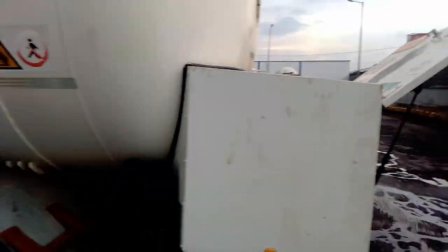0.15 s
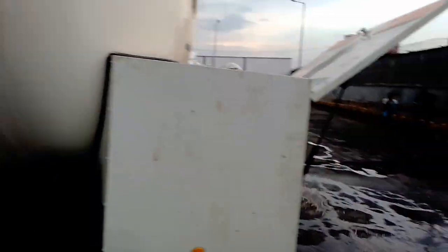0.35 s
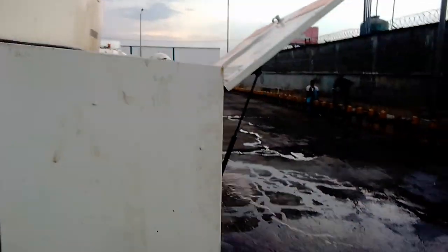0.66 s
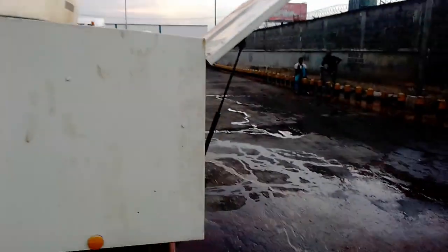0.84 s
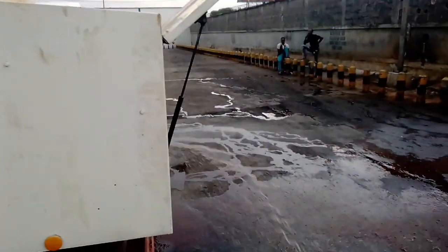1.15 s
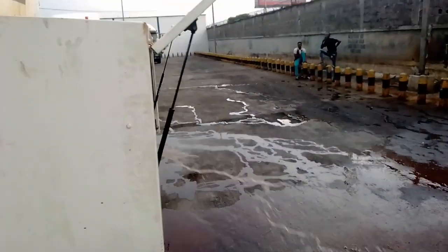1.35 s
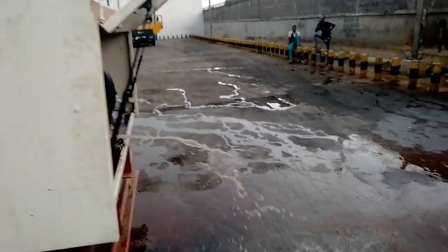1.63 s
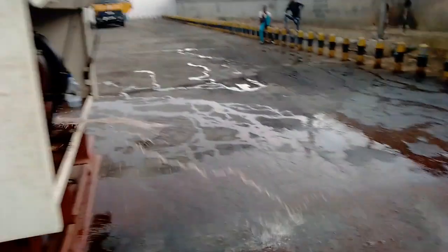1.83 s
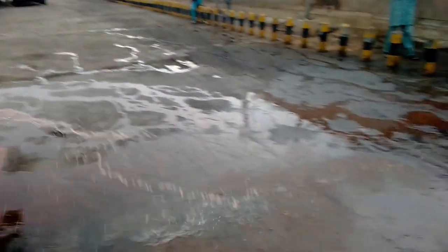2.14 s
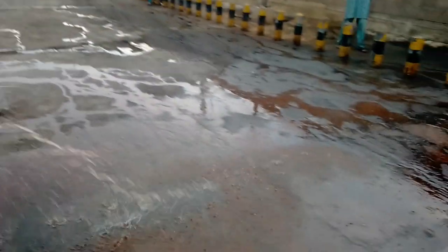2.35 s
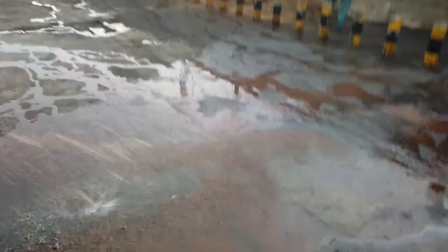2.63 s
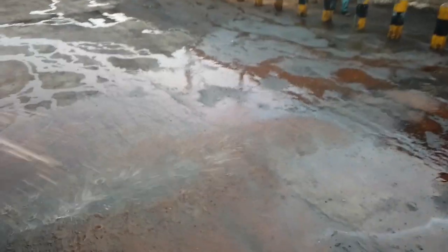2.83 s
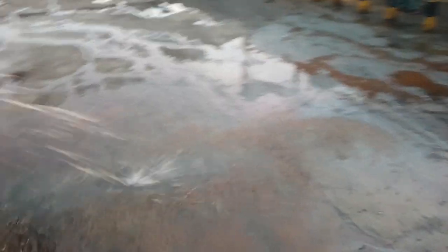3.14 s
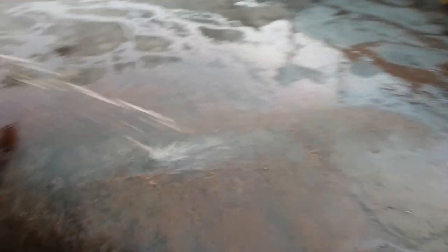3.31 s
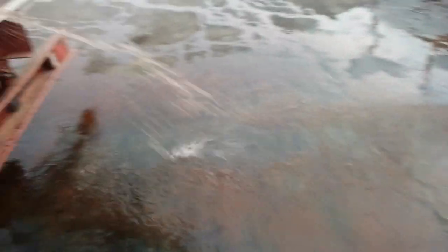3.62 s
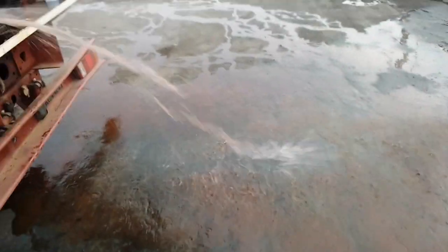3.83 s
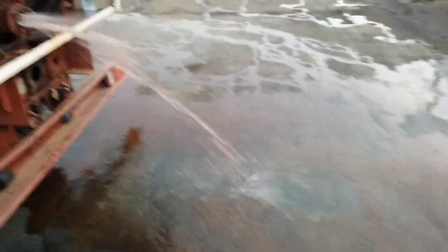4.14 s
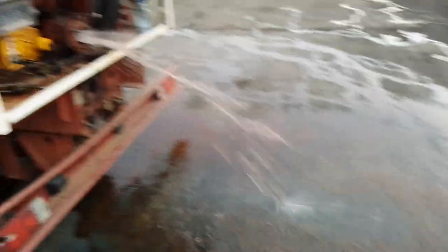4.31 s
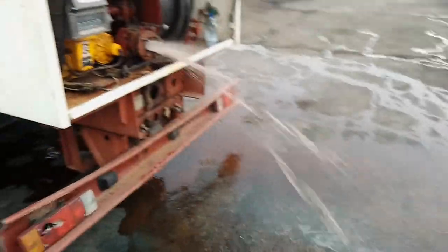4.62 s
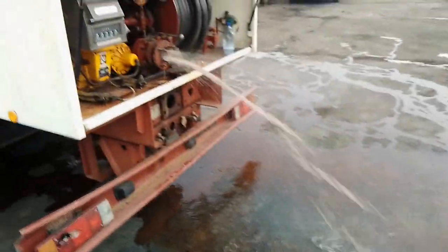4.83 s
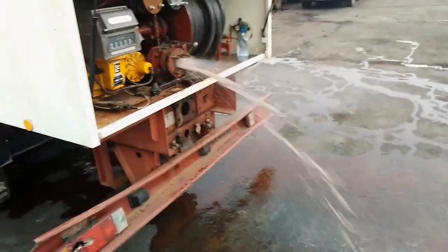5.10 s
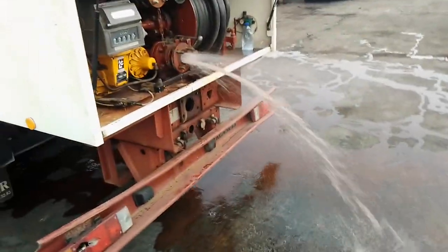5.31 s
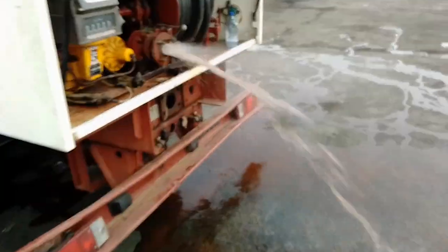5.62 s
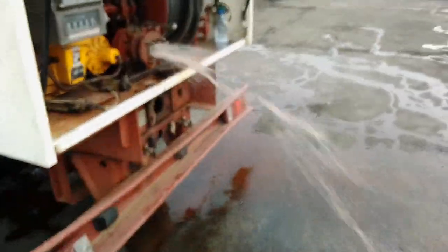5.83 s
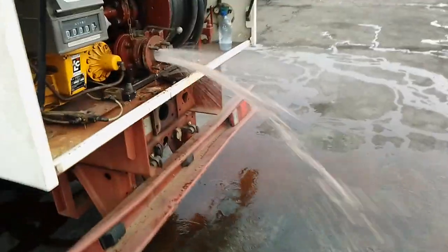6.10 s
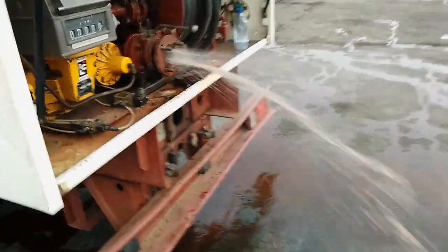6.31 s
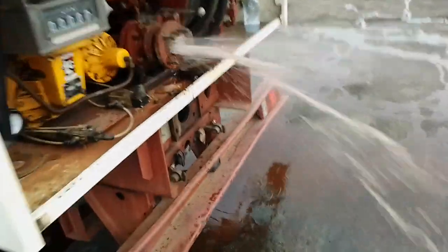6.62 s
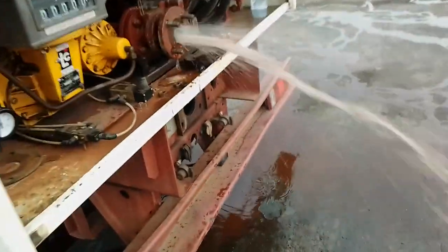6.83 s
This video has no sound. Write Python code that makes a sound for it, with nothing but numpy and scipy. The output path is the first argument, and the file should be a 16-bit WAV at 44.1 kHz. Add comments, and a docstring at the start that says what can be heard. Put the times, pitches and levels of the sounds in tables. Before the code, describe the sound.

Outdoors, a tanker truck's pump keeps up a thin, steady drone while liquid sprays out and splashes on wet pavement. The stream lands in uneven gushes with a few sudden bursts, then sharp slaps of large drops crowd in. A smoother rush blends with the spatter as the microphone, carried around the truck's rear, nears the outlet. The splashing sounds crisp and slightly tinny.

```python
"""At the rear of a tanker truck, on one small microphone carried round it. From the start the pump
drones and its jet breaks up and spatters on wet concrete; the microphone rings near 4 and 12 kHz at
every drop and cuts the drone's bass. Near 1, 2 and 3 s the jet comes back in a burst. Big drops slap
down thickest from 2 to 4.7 s, with a puff of wind near the end of that stretch. From 5 s we are
nearer the nozzle, and a smoother, pulsing wash joins the spatter."""
import sys
import numpy as np
from scipy import signal
from scipy.fft import next_fast_len
from scipy.io import wavfile
from scipy.ndimage import uniform_filter1d

SR = 44100
rng = np.random.default_rng(int(sys.argv[2]) if len(sys.argv) > 2 else 0)


def unload_audio(sound):
    """Save the sound as a 16-bit wav file, at the path given as the first command line argument."""
    columns = np.transpose(np.atleast_2d(sound))
    # keep every value between -1 and 1, then stretch to whole-number steps
    steps = np.round(np.clip(columns, -1, 1) * 32767)
    wavfile.write(sys.argv[1], SR, steps.astype(np.int16))


N = 306936
T = np.arange(N) / SR

# The jet as the microphone rounds the cabinet and turns. Each row: time in seconds, then levels in dB
# of the spatter between gushes, the fine spray, the 6 kHz edge and the 8 kHz middle treble.
JET_LEVELS = [(0, -37.5, -49.5, -51.5, -60), (.46, -35.5, -48, -44, -61), (.9, -35, -50, -51, -60.5),
              (.95, -37.5, -49.5, -46, -58), (1.15, -33, -48, -43.5, -56.5), (1.9, -37, -50, -55, -60),
              (2.05, -33.5, -51.5, -48, -54), (2.35, -33, -45.5, -50, -54), (2.8, -33, -45.5, -45.5, -54.5),
              (2.92, -37.5, -37, -40.5, -49), (3.02, -37, -46, -42.5, -56), (3.3, -32.5, -41.5, -45, -55.5),
              (3.8, -30, -45, -62, -53), (4.3, -36, -47.5, -55, -51), (4.65, -29, -46.5, -53, -53),
              (5.05, -33, -46.5, -47, -57), (5.7, -29, -45, -52, -54.5), (6.2, -30.5, -45.5, -48, -57.5),
              (6.5, -29, -47, -45, -56), (6.96, -31.5, -47, -50, -56)]
# Each row: peak time in seconds, level in dB, length in seconds.
JET_GUSHES = [(.225, -33.5, 0.082), (.668, -34.5, 0.019), (1.4, -32.5, 0.028), (1.49, -38, 0.076),
              (1.62, -33.5, 0.032), (1.75, -31.5, 0.06), (2.055, -29, 0.12), (2.335, -32, 0.11),
              (2.534, -27, 0.039), (2.669, -32.5, 0.038), (2.76, -33.5, 0.043), (2.878, -27, 0.08),
              (3.108, -33, 0.021), (3.168, -31.5, 0.042), (3.273, -30, 0.11), (3.442, -30.5, 0.034),
              (3.582, -29, 0.06), (3.717, -31, 0.075), (3.94, -29.5, 0.12), (4.011, -31.5, 0.024),
              (4.21, -28, 0.11), (4.43, -29.5, .06), (4.605, -29, 0.048), (4.959, -29, 0.11),
              (5.113, -29.5, 0.024), (5.208, -29.5, 0.028), (5.517, -34, 0.04), (5.941, -34, 0.017),
              (6.306, -32.5, 0.055), (6.55, -43, 0.029), (6.765, -28.5, 0.045), (6.93, -26, 0.032)]  # a thick length of the broken jet lands
JET_BURSTS = [(.936, -25.5, 0.084), (1.925, -31.5, 0.024), (3.074, -27, 0.038)]  # the jet returns all at once
HEAVY_SLOPS = [(.21, -43, 0.078), (.62, -53, .1), (.96, -38.5, .07), (1.766, -49, 0.068),
               (2.04, -43.5, 0.11), (2.888, -44, 0.052), (3.283, -50, .08), (3.612, -42, 0.032),
               (3.8, -45, 0.052), (4.43, -39.5, 0.038), (4.654, -46, 0.056), (6.291, -46, 0.1),
               (6.93, -46, 0.073)]  # heavy slops of liquid
WIND_PUFF = [(4.38, -65.5, 0.12)]  # a puff of wind
# The jet breaks off briefly. Each row: time in seconds, dip in dB, length in seconds.
JET_BREAKS = [(.05, -1.5, .04), (1.877, -3, 0.036), (2.262, -5, 0.069), (3.047, -1.5, 0.066),
              (3.352, -11, 0.031), (3.823, -1.5, .04), (4.782, -6, 0.042)]
# Low splashing between slops. Each row: time in seconds, level in dB.
SLOSH_LEVELS = [(0, -50.5), (1.9, -51), (2.4, -46), (4, -46.5), (4.5, -51.5), (5, -48), (6.96, -50)]
# Big drops on the concrete. Each row: start in seconds, peak of the ring in dB, its pitch in Hz.
BIG_DROPS = [(0.2156, -15, 3470), (0.6271, -17, 3780), (0.9374, -13, 4130), (1.1235, -13, 4370),
             (1.4089, -16, 4190), (1.9227, -13, 3770), (1.9456, -16, 4040), (2.241, -18, 3950),
             (2.2724, -23, 4250), (2.2859, -12, 3810), (2.3153, -15, 3600), (2.3323, -13, 3680),
             (2.3637, -11, 4330), (2.3806, -12, 3790), (2.4156, -7, 4000), (2.4679, -19, 4030),
             (2.4864, -13, 3910), (2.5223, -11, 3810), (2.5647, -14, 3930), (2.6426, -14, 4440),
             (2.6685, -11, 3720), (2.7533, -14, 3580), (2.8152, -17, 3490), (2.8266, -12, 3530),
             (2.8481, -12, 3990), (2.8695, -9, 3670), (3.0721, -15, 4230), (3.1085, -11, 3940),
             (3.1479, -17, 4130), (3.1624, -4, 3750), (3.2227, -11, 3810), (3.2601, -12, 3960),
             (3.329, -14, 3630), (3.3704, -18, 3800), (3.4038, -14, 3550), (3.4971, -16, 3710),
             (3.5141, -11, 3980), (3.5475, -11, 4030), (3.5754, -12, 3580), (3.5944, -11, 3800),
             (3.6104, -12, 3590), (3.6403, -13, 3990), (3.7021, -14, 3490), (3.8638, -12, 3650),
             (3.9461, -12, 3750), (4.0903, -10, 3840), (4.1227, -17, 3760), (4.1372, -12, 3720),
             (4.1566, -14, 3780), (4.1995, -12, 3620), (4.226, -11, 3850), (4.3621, -16, 3590),
             (4.429, -13, 3900), (4.4804, -12, 3700), (4.5193, -14, 3760), (4.5522, -10, 3840),
             (4.6904, -12, 3620), (4.7333, -18, 3670), (5.1065, -11, 3750), (6.2858, -10, 4010),
             (6.4554, -8, 3740), (6.5197, -15, 3950), (6.6075, -13, 3680), (6.8854, -13, 3890),
             (6.9109, -16, 4060), (6.9248, -11, 3940)]
# The microphone's ring near 4 kHz. Each row: offset from the centre in Hz, gain in dB.
SPATTER_SHAPE = [(-1500, -18), (-850, -9), (-350, 1), (-14, 3.5), (350, -0.5), (698, -2), (1244, -6),
                 (1900, -14.5), (2586, -44.5)]
# Tone colours at the microphone. Each row: frequency in Hz, gain in dB.
SLOP_SHAPE = [(700, -40), (1100, -24), (1500, 7), (1900, 3.5), (2500, 2), (3000, -14), (3600, -80)]
EDGE_SHAPE = [(5000, 3.5), (5500, 2), (5800, 1.5), (6300, -6), (6800, -11), (7300, -60)]
MIDDLE_SHAPE = [(6000, -16), (6900, -5), (7600, -6), (8600, -4.5), (9500, -7), (11000, -6), (12500, -45)]
SPRAY_SHAPE = [(5590, -50), (9500, -16.5), (10900, -13.5), (12600, 1), (13200, -4), (14100, 0), (15800, -7)]
WIND_TRAFFIC_SHAPE = [(12, -41), (20, -11), (22, -18), (27, -23), (54, -15.5), (113, 7), (135, 2),
                      (165, -10.5), (210, -39), (360, -120)]
# Treble bands that slide as the microphone turns. Each row: start and end in seconds,
# first and last frequency in Hz, width in Hz, level in dB before the jet's flicker.
TREBLE_GLINTS = [(.15, .7, 11850, 11950, 350, -61), (3.05, 4.8, 8700, 7600, 600, -55),
                 (3.8, 5, 7500, 6700, 500, -59), (3.05, 4.25, 12900, 12250, 900, -43),
                 (3.2, 3.8, 13900, 13200, 500, -51), (3.75, 4.45, 11150, 10850, 700, -51),
                 (6.5, 7.6, 12450, 12450, 1000, -42), (3.7, 4.6, 5300, 4500, 800, -50)]
# The pump on the way round the cabinet. Each row: time in seconds, then levels in dB, before
# filtering, of the seven parts below in their order.
PUMP_LEVELS = [(0.1, -47, -45.5, -47.5, -48.5, -54, -57, -50), (1.64, -45, -50.5, -48, -44, -51, -61, -56),
               (1.96, -44.5, -48.5, -45.5, -43.5, -57, -52.5, -50),
               (3.13, -43, -49.5, -47, -39.5, -50, -52, -47.5),
               (4.31, -43.5, -48.5, -45.5, -42.5, -59, -44.5, -60),
               (4.4, -43, -44.5, -41.5, -43, -52, -50, -55),
               (4.73, -44, -52, -46.5, -40.5, -47.5, -48, -58),
               (5.02, -46, -48, -45.5, -46, -45.5, -44, -46),
               (6.17, -50, -48.5, -45, -45.5, -50.5, -48.5, -45),
               (6.29, -45, -48.5, -43, -41.5, -47, -49, -43),
               (6.85, -45.5, -46.5, -46.5, -40.5, -47.5, -47, -44.5)]
# The pump's resonances. Each row: frequency in Hz, width in Hz, relative level in dB.
DRONE_MODES = [(231.3, 39, -12), (271, 31, -5), (296.6, 15.4, -2.5)]
CASING_MODES = [(320, 16, 2), (418, 96, 9.5)]
LOW_PANEL_MODES = [(637, 93, 0.5), (788, 54, 2.5), (868.5, 37, 1)]
HIGH_PANEL_MODES = [(1047, 75, 6.5), (1199, 53, 5.5), (1277, 21, 6), (1366, 94, 5.5), (1462, 17, 6.5),
                    (1614, 90, 5.5), (1655, 140, -9.5)]
LOW_HUM_MODES = [(522.7, 32, -7), (549, 110, -7)]
HIGH_HUM_MODES = [(948, 34, -3.5), (955, 76, -16)]
WHINE_MODES = [(1353, 32, 0)]

SPATTER_HZ, SPATTER_WANDER_HZ = 3808, 49.93
BRIGHTENS_HZ_PER_DB = 20  # a stronger surge spatters higher
RUMBLE_DB, BAND_LIMIT_HZ = -76, 15830


def jet():
    """The broken jet lands on wet concrete: large drops reach every range, fine mist only the top."""
    steady_db, spray_db, edge_db, middle_db = curves(JET_LEVELS)
    dip_db = sum(db * np.exp(-(2 * (T - s) / length) ** 2) for s, db, length in JET_BREAKS)
    spatter_power = amp(2 * steady_db) + swells(JET_GUSHES) + swells(JET_BURSTS, rise=.05)
    spatter_db = 10 * np.log10(spatter_power) + dip_db + 0.56 * wander(8.8)
    slop_db = 10 * np.log10(amp(2 * curves(SLOSH_LEVELS)[0]) + swells(HEAVY_SLOPS))
    large = drops(per_s=4600, spread_db=3, clumps_per_s=130, clump_s=0.0018)
    fine = drops(per_s=5000, spread_db=4.5, clumps_per_s=45, clump_s=0.0039)
    # nearer the nozzle the jet itself adds a smoother, pulsing wash
    nearness = np.interp(T, [0, 4.6, 5.0, 6.96], [0.13, 0.23, 0.52, 0.57])
    wash = nearness * noise() * amp(wander(51))
    surge_db = spatter_db - uniform_filter1d(spatter_db, int(.3 * SR))  # quick surges lift the treble too
    centre_hz = SPATTER_HZ + SPATTER_WANDER_HZ * wander(2.5) + BRIGHTENS_HZ_PER_DB * surge_db
    spatter = amp(spatter_db) * steadied(microphone_ring(large + wash, centre_hz), 0.082)
    edge = steadied(coloured(large + 0.14 * fine + wash, EDGE_SHAPE), 0.1)
    edge *= amp(edge_db + 0.6 * surge_db)
    slop = amp(slop_db) * steadied(coloured(0.61 * large + 0.63 * noise(), SLOP_SHAPE), 0.35)
    middle = steadied(coloured(1.4 * large + .5 * fine[::-1] + .5 * noise(), MIDDLE_SHAPE), 0.37)
    middle *= amp(middle_db + 0.73 * surge_db)
    mist = 0.99 * large + fine + 0.3 * noise()
    spray = steadied(coloured(mist, SPRAY_SHAPE), 0.14)
    spray *= amp(spray_db + 0.34 * surge_db + 0.44 * wander(6.1))
    flicker = amp(.5 * surge_db + 3.2 * wander(12))
    return spatter + edge + slop + middle + spray + flicker * glints(mist)


def drops(per_s, spread_db, clumps_per_s, clump_s, clump_db=6.5):
    """Drops click in very unequal sizes; each clump of broken jet lands at once and dies away."""
    size = amp(spread_db * np.minimum(rng.exponential(1, N), 2.8)) * rng.choice([-1., 1.], N)
    landings = np.minimum(rng.exponential(1, N), 1.2) * (rng.random(N) < clumps_per_s / SR)
    clumps = signal.lfilter([1], [1, -np.exp(-1 / (clump_s * SR))], landings)
    clicks = size * (rng.random(N) < per_s / SR) * (1 + amp(clump_db) * clumps)
    return unit_rms(patchy(echoed(clicks)))


def microphone_ring(x, centre_hz):
    """Drops ring the microphone: a band shaped round 8 kHz, then slid down to a moving centre."""
    band = coloured(x, [(8000 + hz, db) for hz, db in SPATTER_SHAPE])
    slide = np.exp(2j * np.pi * np.cumsum(centre_hz - 8000) / SR)
    return (signal.hilbert(band, next_fast_len(N))[:N] * slide).real


def glints(mist):
    """As the microphone turns, treble bands of the mist rise, slide and fade."""
    out = np.zeros(N)
    for start, end, first_hz, last_hz, width, db in TREBLE_GLINTS:
        span = slice(int(start * SR), int(end * SR))
        along = (T[span] - start) / (end - start)
        carrier = np.exp(2j * np.pi * np.cumsum(first_hz + (last_hz - first_hz) * along) / SR)
        band = (carrier * signal.lfilter(*signal.butter(2, width / 2, fs=SR), mist[span] / carrier)).real
        out[span] += amp(db) * unit_rms(band) * np.sin(np.pi * along) ** 0.42
    return out


def slaps():
    """Each big drop is a few cycles of microphone ring with a tick of spray."""
    out, t = np.zeros(N + 400), np.arange(200) / SR
    ring_shape = np.exp(-((t - .0011) / np.where(t < .0011, .0003, .0006)) ** 2)
    tick_shape = np.exp(-((t - .001) / 0.00018) ** 2)
    spray_db = curves(JET_LEVELS)[1]
    for start, db, hz in BIG_DROPS:
        ring_phase, tick_phase, pitch, strength = rng.random(4)
        ring = ring_shape * np.sin(2 * np.pi * (hz * t + ring_phase))
        tick = tick_shape * np.sin(2 * np.pi * ((11500 + 3000 * pitch) * t + tick_phase))
        at = round(start * SR)
        out[at:at + len(t)] += amp(db) * ring + amp(spray_db[at] + 9 + 8 * strength) * tick
    return echoed(out[:N])


def echoed(x, decay_s=0.022, echo_db=-10, turns_per_s=23):
    """Steel and puddles close by throw each drop back; the landing spot moves, so four tails take turns."""
    t = np.arange(2000) / SR
    tails = rng.standard_normal((4, len(t))) * amp(-60 * t / decay_s) * (t > .0012)
    out = x.copy()
    for k, tail in enumerate(tails):
        apart = (turns_per_s * T - k + 2) % 4 - 2
        share = np.cos(np.pi / 2 * np.clip(apart, -1, 1))
        out += amp(echo_db) * signal.oaconvolve(x * share, tail / np.linalg.norm(tail))[:N]
    return out


def patchy(x, depth_db=2):
    """The landing spot keeps moving, so the colour drifts in patches of time and pitch."""
    spectra = signal.stft(x, nperseg=256)[2]
    patches = uniform_filter1d(rng.standard_normal(spectra.shape), size=3, axis=0)
    patches = uniform_filter1d(patches, size=30, axis=1)
    return signal.istft(spectra * amp(depth_db * unit_rms(patches)), nperseg=256)[1][:N]


def pump():
    """At the truck's rear, turbulent flow and loose parts shake the pipe, casing and cabinet panels."""
    parts = (DRONE_MODES, CASING_MODES, LOW_PANEL_MODES, HIGH_PANEL_MODES,
             LOW_HUM_MODES, HIGH_HUM_MODES, WHINE_MODES)
    out = np.zeros(N)
    for level_db, modes in zip(curves(PUMP_LEVELS), parts):
        shake = noise() * amp(1.33 * wander(19.5))
        ringing = sum(amp(db) * unit_rms(resonate(shake, hz, width)) * (-1) ** k
                      for k, (hz, width, db) in enumerate(modes))
        out += amp(level_db) * steadied(ringing, 0.45)
    dulled = signal.sosfilt(signal.butter(2, 2200, fs=SR, output="sos"), out)
    microphone_bass_cut = signal.butter(6, 205, "high", fs=SR, output="sos")
    return signal.sosfilt(microphone_bass_cut, dulled)


def rumble():
    """Light wind and far traffic: lumpy low noise with one puff."""
    low = steadied(coloured(noise(), WIND_TRAFFIC_SHAPE), 0.47)
    return np.sqrt(amp(2 * RUMBLE_DB) + swells(WIND_PUFF)) * amp(1.5 * wander(1.6)) * low


def swells(rows, rise=0.55):
    """Power of events that rise quickly and fall more slowly; rise is a share of the length."""
    return sum(amp(2 * db) * np.exp(-((T - s) / (length * np.where(T < s, rise, 1))) ** 2)
               for s, db, length in rows)


def coloured(x, points):
    """Causal filter with the gain of the points: each click rings after itself, never before."""
    hz, db = np.transpose(points)
    grid_hz = abs(np.fft.fftfreq(4096, 1 / SR))
    gain_db = np.interp(np.log(grid_hz + 1), np.log(hz + 1), db, left=-60, right=-60)
    log_gain = uniform_filter1d(np.log(amp(gain_db)), size=9, mode="wrap")
    taps = np.fft.ifft(np.exp(np.conj(signal.hilbert(log_gain)))).real[:2048]
    return signal.oaconvolve(x, taps)[:N]


def resonate(x, hz, width):
    """One resonance of peak gain 1."""
    return signal.lfilter(*signal.iirpeak(hz, hz / width, SR), x)


def steadied(x, span_s):
    """Divides out the slow level so that a curve can set it."""
    return x / np.sqrt(uniform_filter1d(x ** 2, int(span_s * SR)) + 1e-12)


def curves(rows):
    """Every column after the time, one value a sample."""
    times, *columns = np.transpose(rows)
    return [np.interp(T, times, column) for column in columns]


def wander(cutoff_hz):
    """Slow random drift of rms 1."""
    return unit_rms(signal.lfilter(*signal.butter(2, cutoff_hz, fs=SR), noise()))


def noise():
    """White noise."""
    return rng.standard_normal(N)


def unit_rms(x):
    """Scales to rms 1."""
    return x / np.sqrt(np.mean(x ** 2) + 1e-20)


def amp(db):
    """Decibels to gain."""
    return 10 ** (np.asarray(db) / 20)


def scene():
    """All sources at one microphone."""
    return (jet() + slaps() + pump() + rumble())[None]


def record(dry):
    """The top end stops sharply at the band limit."""
    lowpass = signal.firwin(1023, BAND_LIMIT_HZ, window=("kaiser", 9), fs=SR)
    return signal.oaconvolve(dry, lowpass[None], "same")


dry = scene()
out = record(dry)
unload_audio(out)
```